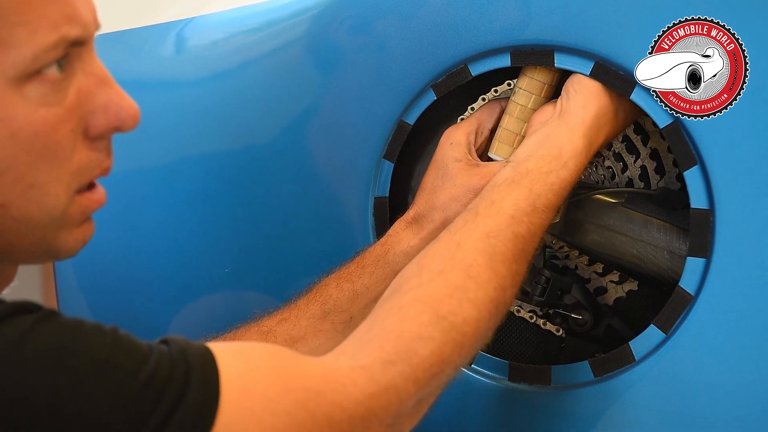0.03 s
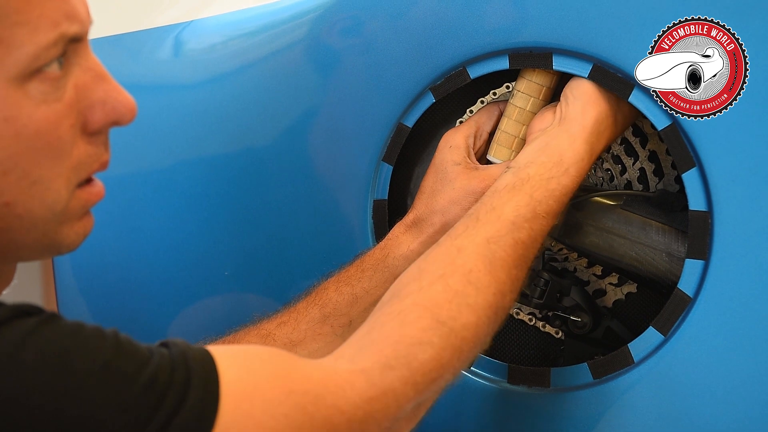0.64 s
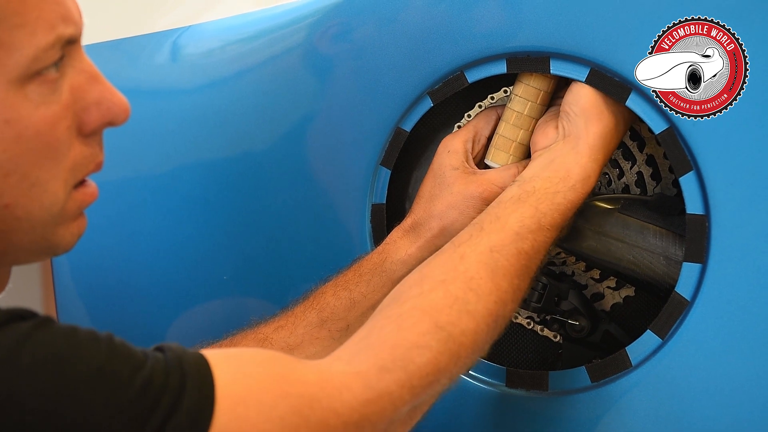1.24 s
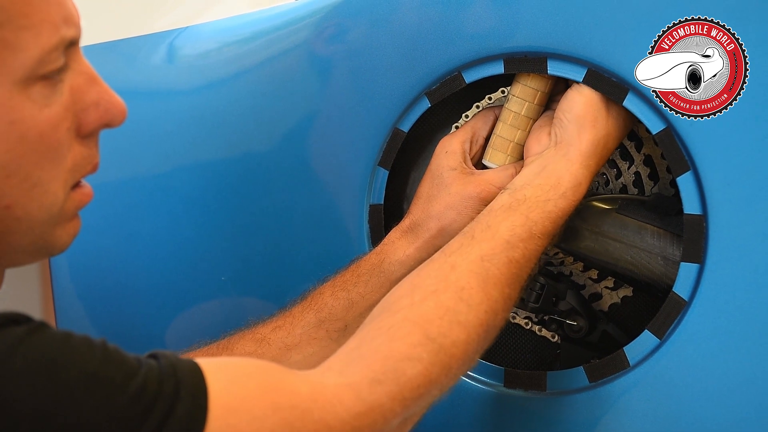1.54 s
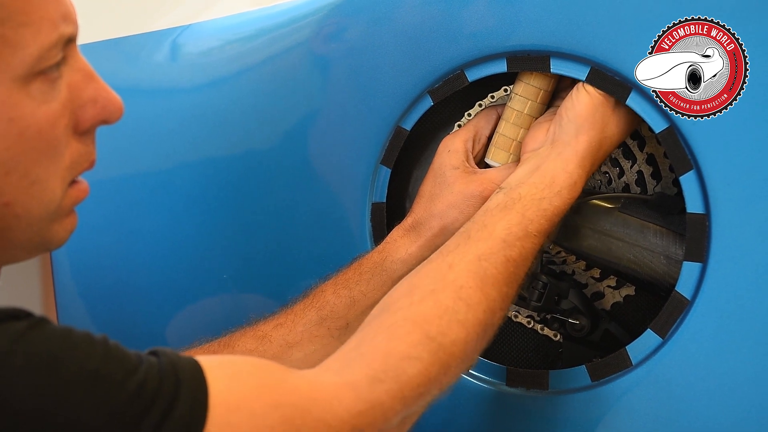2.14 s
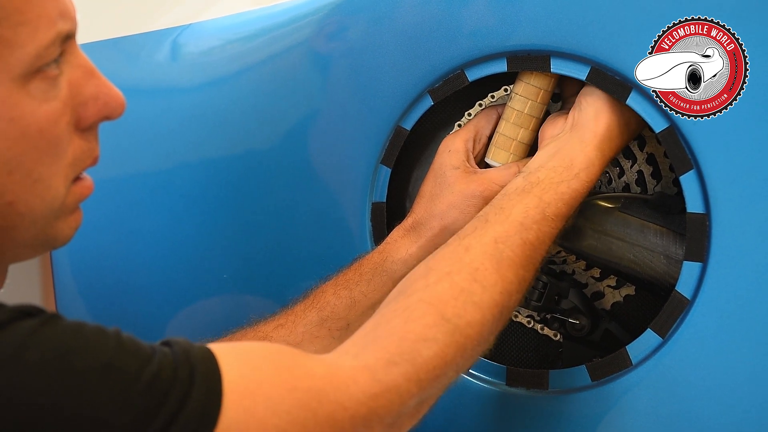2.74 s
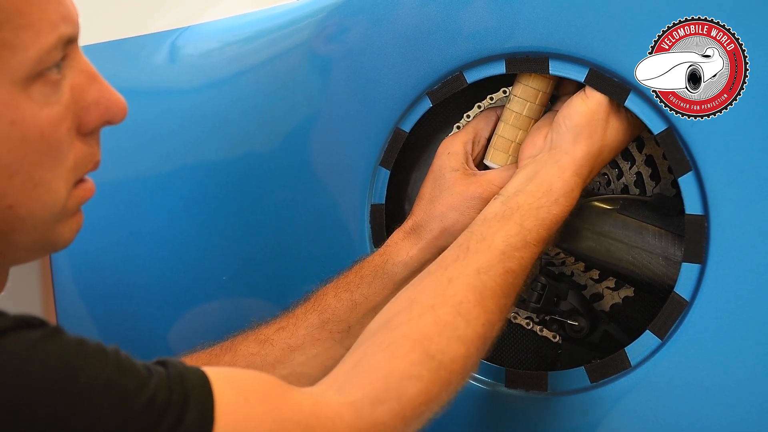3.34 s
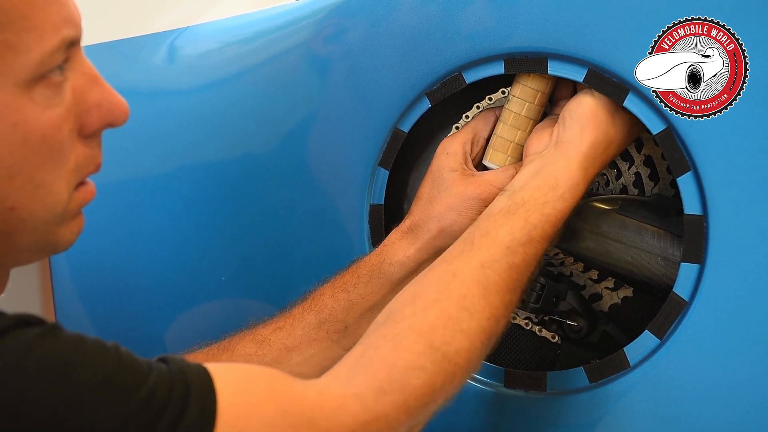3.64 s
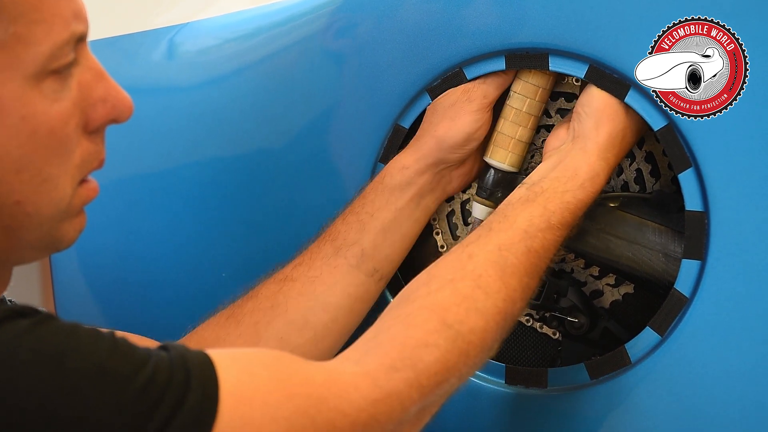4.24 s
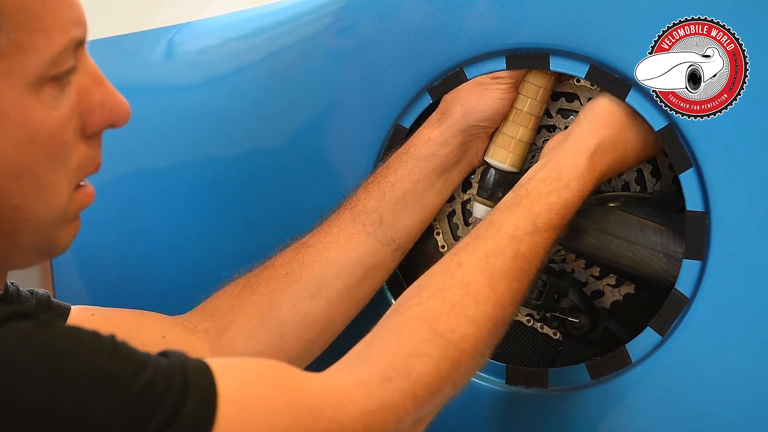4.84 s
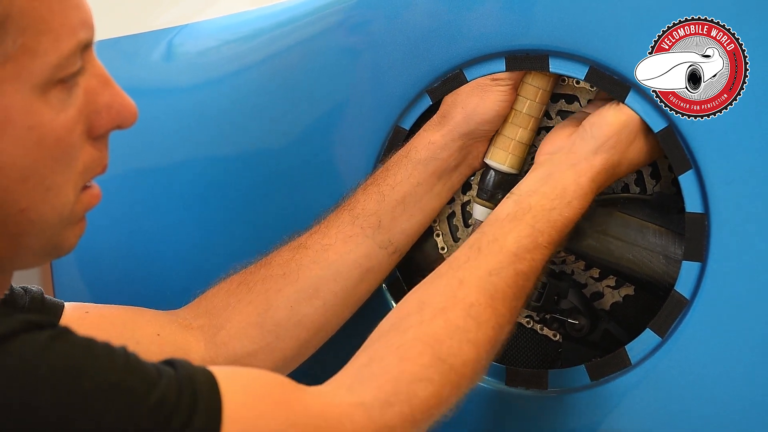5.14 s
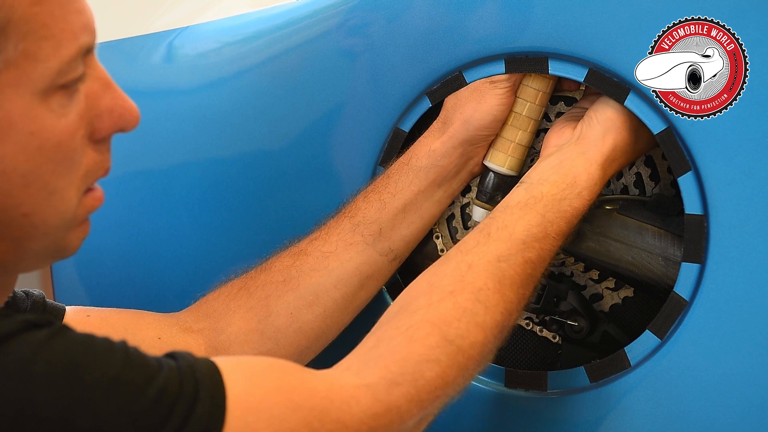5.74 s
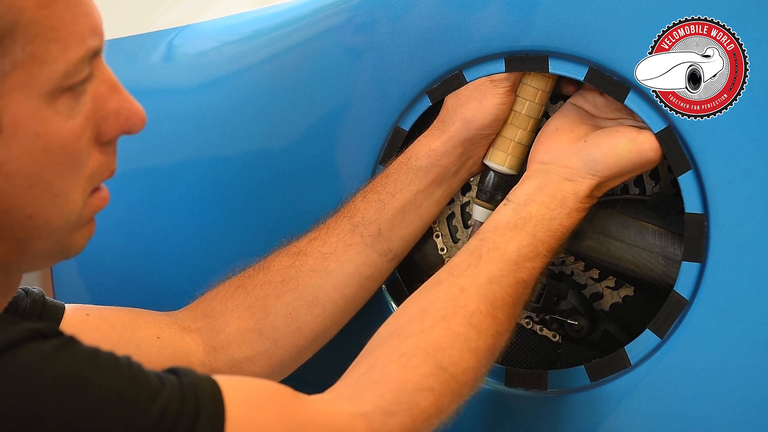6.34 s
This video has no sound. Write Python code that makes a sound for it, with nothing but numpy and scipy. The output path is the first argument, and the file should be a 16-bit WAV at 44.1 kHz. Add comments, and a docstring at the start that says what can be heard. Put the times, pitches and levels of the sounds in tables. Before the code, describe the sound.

A brief, faint foam squeak opens a string of uneven hollow knocks as a strut bumps the shell of a pedal vehicle. Three hard thumps stand out among weaker taps, while hands slide softly over foam and a rocking wheel adds small bursts of thin metallic clicks. It is all heard from nearby in a slightly echoing workshop with a low ventilation rumble.

```python
"""Pushing foam rings onto a strut

In a workshop, hands press foam rings onto a suspension strut inside a pedal vehicle's hollow shell.
Each shove knocks the strut and the shell booms. The foam squeaks once and rubs under the hands.
The rear wheel rocks, so the small catches (pawls) of its freewheel click over teeth in short runs.
The room rings for about half a second over faint ventilation."""
import sys
import numpy as np
from scipy import signal
from scipy.fft import rfft, irfft, next_fast_len
from scipy.io import wavfile
from scipy.ndimage import uniform_filter1d

SR = 44100
rng = np.random.default_rng(int(sys.argv[2]) if len(sys.argv) > 2 else 0)


def wrap_up_sound(samples):
    """Save the sound to the file named by the first command line argument, as 16-bit audio."""
    columns = np.atleast_2d(samples).T
    # keep every value between -1 and 1, then stretch to whole-number steps
    tamed = np.clip(columns, -1, 1)
    steps = np.round(tamed * 32767).astype(np.int16)
    wavfile.write(sys.argv[1], SR, steps)


N = 290045

# knocks of the strut on the shell: start_s, strength_db, spot_pitch_hz, softness_db_per_octave
KNOCK_EVENTS = [(0, -26.5, 150, 5), (0.2423, -26.5, 950, 12.5), (0.4507, -8, 388, 10.5),
                (.753, -23.5, 317, 10), (.795, -30, 380, 9.5), (.8545, -37, 695, 4.5),
                (.974, -39, 358, 12.5), (1.079, -31, 287, 15), (1.111, -42, 463, 15),
                (1.401, -40.5, 192, 5.5), (1.425, -35, 280, 3), (1.578, -46, 238, 5.5),
                (1.9549, -11.5, 404, 9.5), (2.604, -17, 366, 10), (2.722, -18.5, 990, 11),
                (3.126, -52.5, 327, 7), (3.232, -40.5, 406, 13), (3.5065, -43.5, 650, 4.5),
                (3.5157, -12.5, 385, 11), (3.795, -24, 800, 10), (3.823, -23, 410, 8.5),
                (4.13, -46, 283, 7), (4.255, -42, 454, 16.5), (4.337, -29, 214, 4), (4.607, -41, 557, 8.5),
                (4.783, -21, 636, 11.5), (5.024, -51.5, 560, 8), (5.176, -54, 720, 8),
                (5.389, -15.5, 382, 12.5), (5.502, -30.5, 470, 11), (5.571, -41.5, 407, 7),
                (5.857, -34.5, 400, 6), (6.438, -26, 346, 17.5)]
# a knock's five pitch bands (boom, panel, rap, edge, tick): low_hz, high_hz
BAND_EDGES = [(100, 400), (400, 1000), (1000, 1800), (1800, 3500), (3500, 14000)]
# how well the shell gives off each band: gain_db
BAND_GAINS = [-0.5, -0.56, 0.21, -2.64, 0.68]
# how each band rings: crack_fade_s, boom_vs_crack_db, push_vs_crack_db (a fade time is a 60 dB drop)
BAND_RINGING = [(0.16, 2.5, -7), (0.068, 5.5, 3), (0.11, -3.5, -7.5), (0.14, -35, -17), (0.014, -33.5, -8)]
# ringing tones of the shell and its air, before extra damping: pitch_hz, relative_db, fade_s
SHELL_TONES = [(146, -19, 0.63), (176.7, 1.5, 0.24), (227, 1.5, 0.18), (265.7, 0.5, 0.45),
               (303.6, 0.5, 0.36), (364, -4.5, 0.13), (397.6, -4, 0.2), (411, -11, 0.12), (487, -25, 0.93),
               (552, 3, 0.074), (588, 10.5, 0.078), (635.4, 7.5, 0.24), (694.5, 3, 0.16),
               (764.4, 2.5, 0.26), (836, -10.5, 0.16), (991, -11.5, 0.3), (1120, -10.5, 0.054),
               (1118, 2, 0.11), (1157, -11.5, 0.45), (1206, -9.5, .1), (1366, -7, 0.16), (1568, -7, 0.089),
               (1620, -49, 0.14), (2038, -5, 0.11), (1930, -40, 0.085), (2490, -31, 0.17)]
# the shell's crowd of weaker tones, heard as a crack: pitch_hz, relative_db
CRACK_SPECTRUM = [(50, -19), (90, -16), (130, 2.5), (200, 1.5), (450, 2), (700, -8), (1200, -2),
                  (2000, -25), (3200, -33.5), (6000, -34), (10000, -49), (15000, -76)]
# the squeak of foam: pitch_hz, relative_db
SQUEAK_SPECTRUM = [(1500, -30), (3000, -4.5), (4500, 2), (6500, -0.5), (9000, -2.5), (10500, -17),
                   (15000, -29)]
# hands sliding over the foam: middle_s, length_s, murmur_db, hiss_db
HAND_SLIDES = [(0.03, 0.088, -31.5, -42), (2.27, 0.58, -45.5, -59), (3.334, 0.15, -46, -66),
               (3.8, 0.24, -39, -59), (4.42, 0.25, -47.5, -48.5), (4.689, 0.17, -44, -52),
               (5.292, 0.28, -50, -80), (5.534, 0.1, -36.5, -71), (6.196, 0.076, -41.5, -53)]
# the shell's murmur during a slide: pitch_hz, relative_db
MURMUR_SPECTRUM = [(50, -16), (130, 5.5), (250, 5.5), (600, 1), (1200, -8), (2000, -25.5), (4000, -40),
                   (15000, -64)]
# the hiss where skin meets foam: pitch_hz, relative_db
HISS_SPECTRUM = [(500, 17.5), (1800, 5), (4000, -5), (7000, -5), (10000, -13.5), (15000, -24)]
# the ventilation: pitch_hz, relative_db
AIR_SPECTRUM = [(20, -1), (30, 1.5), (42, 1.5), (52, 4), (72, 16), (100, -8), (200, 0.5), (400, -8.5),
                (800, -7.5), (1600, -20.5), (3000, -24), (7000, -26), (15000, -26.5)]
# how long the workshop echoes: pitch_hz, fade_s
ROOM_FADES = [(80, 0.79), (210, 0.67), (560, 0.47), (1500, 0.56), (4000, 0.44), (8000, 0.35), (14000, 0.36)]
# rocks of the wheel: start_s, tooth_count, length_s, level_db
WHEEL_ROCKS = [(0.052, 3, .0225, -46), (0.089, 2, 0.0091, -44.5), (0.1213, 1, 0.01, -45.5),
               (0.1978, 1, 0, -43.5), (0.6034, 8, 0.1, -45), (1.1684, 1, 0, -45.5), (1.2274, 1, 0, -42.5),
               (2.3081, 3, 0.066, -43), (2.4113, 2, .021, -43.5), (2.4703, 2, 0.031, -45),
               (2.573, 1, 0, -43.5), (2.727, 1, 0.052, -52), (3.7197, 3, 0.031, -44.5),
               (3.869, 2, .0332, -43), (5.4855, 1, 0, -61), (5.646, 1, 0, -39), (5.6739, 6, .088, -40.5),
               (5.9546, 1, 0, -40.5)]
# the steel snap of a pawl: pitch_hz, relative_db
SNAP_SPECTRUM = [(400, 0.5), (800, -5.5), (1200, -1.5), (2200, -14.5), (3200, -13), (4500, -6.5),
                 (7000, 11.5), (9500, 9.5), (13500, 8.5), (16000, -15)]
# ringing tones of the hub and sprockets: pitch_hz, relative_db, fade_s
HUB_TONES = [(1149, 15.5, 0.23), (1173, -16, 0.104), (1517, 3, 0.35), (1860, -13, 0.14), (3710, 6, 0.059),
             (4320, 13.5, 0.042), (5450, 19, 0.014), (6560, 16.5, 0.036), (6500, -33, 0.073),
             (7200, -14, 0.069), (7800, -20, .08), (8900, 4.5, 0.081), (11100, 12, 0.011)]


def undb(db):
    """Turn decibels into a number to multiply by."""
    return 10 ** (np.asarray(db) / 20)


def level(x, db, span_s=None):
    """Scale x so that its first span_s seconds (or all of it) have this average (rms) level."""
    head = x if span_s is None else x[:int(span_s * SR)]
    return x * undb(db) / np.sqrt(np.mean(head ** 2))


def fade(t, fade_s):
    """A curve that dies away by 60 dB every fade_s seconds."""
    return np.exp(-np.log(1000) * t / max(fade_s, 1e-3))


def at_pitch(hz, points):
    """Read between a table's (pitch_hz, value) rows, with octaves evenly spaced."""
    pitches, values = np.transpose(points)
    return np.interp(np.log(np.maximum(hz, 1)), np.log(pitches), values)


def tint(x, spectrum):
    """Shape the bass and treble of x with a spectrum table, then set its level to 0 dB."""
    size = next_fast_len(len(x))
    gain = undb(at_pitch(np.fft.rfftfreq(size, 1 / SR), spectrum))
    return level(irfft(rfft(x, size) * gain, size)[:len(x)], 0)


def band(x, lo, hi, order=3):
    """Keep the pitches between lo and hi, in Hz."""
    return signal.sosfilt(signal.butter(order, [lo, hi], "band", fs=SR, output="sos"), x)


def add(track, start_s, x):
    """Mix x into the track at start_s."""
    i = int(np.clip(start_s * SR, 0, N - 1))
    track[i:i + len(x)] += x[:N - i]


def ring(t, tones, scatter, detune):
    """Struck tones, new for each blow. Heard away from it, they alternate in sign, so the ring swells."""
    sound = 0
    for k, (hz, db, fade_s) in enumerate(tones):
        gain = undb(db) * (1 + scatter * rng.standard_normal())
        pitch_hz = hz * (1 + detune * rng.standard_normal())
        sound += (-1) ** k * gain * fade(t, fade_s) * np.sin(2 * np.pi * pitch_hz * t)
    return sound


def shoves(count=3):
    """The hardest knocks: full shoves of the foam stack."""
    return sorted(KNOCK_EVENTS, key=lambda knock: -knock[1])[:count]


def bounces(delay_s=.011, drop_db=4, extra_softness=6.5):
    """Each hard shove bounces once, making a quieter, duller knock."""
    return [(at + delay_s, db - drop_db, hz, soft + extra_softness) for at, db, hz, soft in shoves()]


def knock_levels(strength_db, spot_hz, softness, bass_db_per_octave=7):
    """Level per band: a stiff spot moves little air below its pitch, and a soft contact loses treble."""
    octaves = np.log2(np.sqrt(np.prod(BAND_EDGES, axis=1)) / spot_hz)
    tilt_db = bass_db_per_octave * np.minimum(octaves, 0) - softness * np.maximum(octaves, 0)
    return strength_db + np.array(BAND_GAINS) + tilt_db


def knocks(hold_s, blow_s=.03):
    """The strut bumps the shell: a push, a crack that crosses it for hold_s, then a ringing boom."""
    at_opening, into_room = np.zeros(N), np.zeros(N)
    t = np.arange(SR // 2) / SR
    tap = signal.unit_impulse(len(t))
    for start, strength_db, spot_hz, softness in KNOCK_EVENTS + bounces():
        levels = knock_levels(strength_db, spot_hz, softness)
        tones = ring(t, SHELL_TONES, scatter=.35, detune=.008) * fade(t, fade_s=.6)
        crowd = tint(rng.standard_normal(len(t)), CRACK_SPECTRUM)
        for (lo, hi), db, (fade_s, boom_db, push_db) in zip(BAND_EDGES, levels, BAND_RINGING):
            # the shell's layered wall damps the top band soonest
            dying = fade(np.maximum(t - hold_s, 0), fade_s)
            rise = 1 - np.exp(-t * hi)
            crack = level(band(crowd, lo, hi) * dying * rise, 0, blow_s)
            push = level(band(tap, lo, (lo + hi) / 2), push_db, blow_s)
            boom = level(band(tones, lo, hi), boom_db, blow_s)
            add(at_opening, start, level(push + crack + boom, db, blow_s))
            add(into_room, start, level(push + crack + boom / 2, db, blow_s))
    return at_opening, into_room


def squeak(start_s, length_s, db, slip_hz, glide):
    """A foam ring drags on the strut, sticking and slipping in quick pulses that waver and slow."""
    progress = np.linspace(0, 1, int(length_s * SR))
    waver = .012 * level(uniform_filter1d(rng.standard_normal(len(progress)), size=200), 0)
    cycles = np.cumsum(slip_hz * (1 + glide * progress + waver)) / SR
    pulses = level(np.diff(cycles % 1, prepend=0), 0) + .5 * rng.standard_normal(len(progress))
    loudness = np.minimum(progress * 20, 1) * (1 - progress)
    track = np.zeros(N)
    add(track, start_s, level(tint(pulses, SQUEAK_SPECTRUM) * loudness, db))
    return track


def rubbing(slips_per_s=3000, seating_s=.096):
    """Skin and foam catch and slip in tiny steps that murmur in the shell and hiss where they touch."""
    t = np.arange(N) / SR
    slips = rng.standard_normal(N) * (rng.random(N) < slips_per_s / SR)
    murmur = tint(slips, MURMUR_SPECTRUM)
    hiss = tint(rng.standard_normal(N), HISS_SPECTRUM)
    # around each hard shove the foam slides into its seat, far quieter than the knock
    seatings = [(at, seating_s, db - 36, db - 48.5) for at, db, _, _ in shoves()]
    track = np.zeros(N)
    for middle_s, length_s, murmur_db, hiss_db in HAND_SLIDES + seatings:
        swell = np.exp(-(2 * (t - middle_s) / length_s) ** 2)
        track += swell * (undb(murmur_db) * murmur + undb(hiss_db) * hiss)
    return track


def ventilation(db):
    """Moving air makes a low, steady rumble under a faint hiss."""
    return undb(db) * tint(rng.standard_normal(N), AIR_SPECTRUM)


def room(x, echo_db, build_s, gap_s=.007):
    """Blurred echoes from the walls build up after a short gap and die sooner in the treble."""
    t = np.arange(SR) / SR
    noise, tail = rfft(rng.standard_normal(SR)), 0
    edges_hz = 45 * 2 ** (np.arange(18) / 2)  # half an octave apart
    hz = np.fft.rfftfreq(SR, 1 / SR)
    for lo, hi in zip(edges_hz, edges_hz[1:]):
        part = irfft(noise * (hz >= lo) * (hz < hi), SR)
        tail += part * fade(t, at_pitch(np.sqrt(lo * hi), ROOM_FADES))
    tail *= 1 - np.exp(-np.maximum(t - gap_s, 0) / build_s)
    return undb(echo_db) * signal.fftconvolve(x, tail / np.sqrt(np.sum(tail ** 2)))[:N]


def teeth(jitter_s=.0006, scatter_db=.45):
    """The rocking wheel drags the pawls over teeth, each a little different in time and level."""
    for start, count, length_s, db in WHEEL_ROCKS:
        for at in start + np.linspace(0, length_s, count):
            late, weak = rng.standard_normal(2)
            yield at + jitter_s * late * (at > start), db - scatter_db * weak


def freewheel(steel_fade_s, hub_fade_s, buzz_db, buzz_fade_s, snap_s=.008):
    """Two pawls drop off a tooth a moment apart, the spokes buzz briefly and the hub rings faintly."""
    snaps, rings = np.zeros(N), np.zeros(N)
    t = np.arange(SR // 4) / SR
    buzz = undb(buzz_db) * fade(t, buzz_fade_s)
    for start, steel_db in teeth():
        hub_db = steel_db + 3.5
        lag_s = rng.uniform(.0015, .004)
        noise = tint(rng.standard_normal(len(t)), SNAP_SPECTRUM)
        # the small steel pawls (treble) fall silent sooner than the heavy hub (middle pitches)
        for lo, hi, db, fade_s in (3500, 16000, steel_db, steel_fade_s), (450, 3500, hub_db, hub_fade_s):
            drops = fade(t, fade_s) + (t > lag_s) * fade(np.abs(t - lag_s), fade_s) / 2
            add(snaps, start, level(band(noise * (drops + buzz), lo, hi), db, snap_s))
        hub_ring = ring(t, HUB_TONES, scatter=.4, detune=.005)
        add(rings, start, level(hub_ring, hub_db - 4.5, snap_s))
    return snaps, rings


def scene():
    """Shell, foam, hands and freewheel sound together in one room."""
    at_opening, into_room = knocks(hold_s=.0089)
    snaps, rings = freewheel(steel_fade_s=.013, hub_fade_s=.039, buzz_db=-19.5, buzz_fade_s=.14)
    hands = rubbing()
    bright = snaps + squeak(start_s=0, length_s=.059, db=-39, slip_hz=949, glide=-.09)
    echoes = room(into_room + hands, echo_db=-8.5, build_s=.0022)
    # the highest treble beams out of the shell's opening and hardly reaches the walls
    echoes += room(band(bright, 270, 5700, order=1), echo_db=-3.5, build_s=.00047)
    return (at_opening + hands + bright + rings + echoes + ventilation(db=-57))[None]


def record(dry):
    """Cut away the very highest treble, above 15700 Hz."""
    return signal.sosfilt(signal.ellip(8, .2, 70, 15700, fs=SR, output="sos"), dry)


dry = scene()
out = record(dry)
wrap_up_sound(out)
```